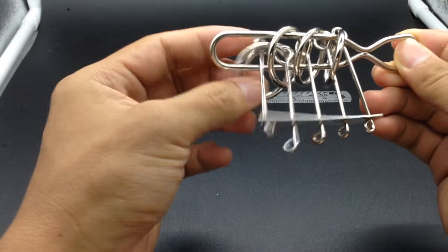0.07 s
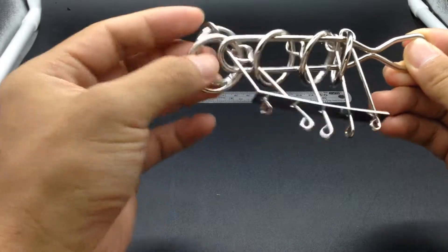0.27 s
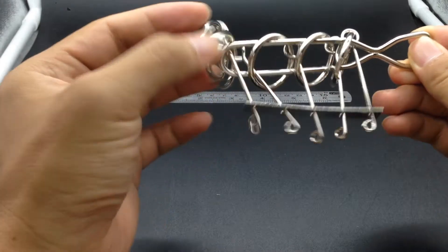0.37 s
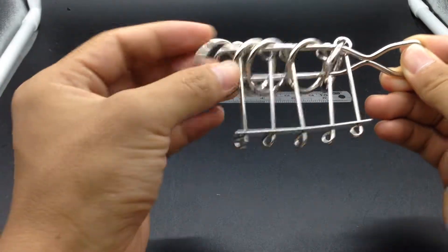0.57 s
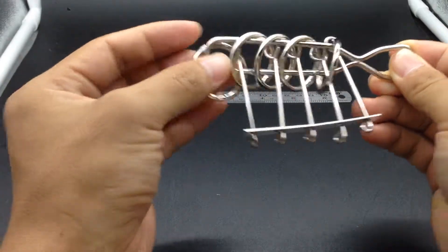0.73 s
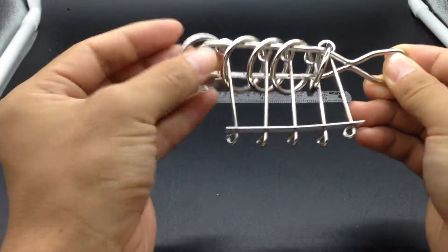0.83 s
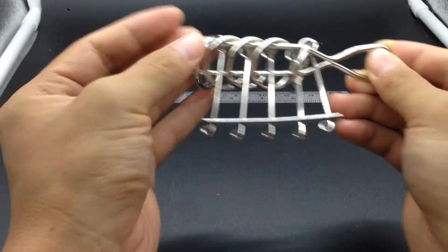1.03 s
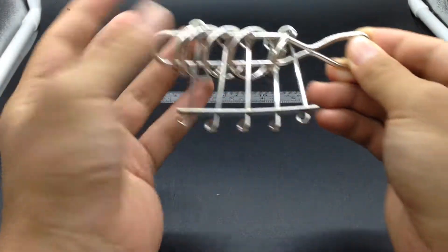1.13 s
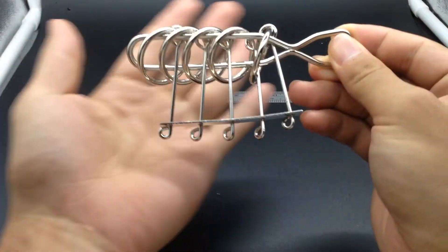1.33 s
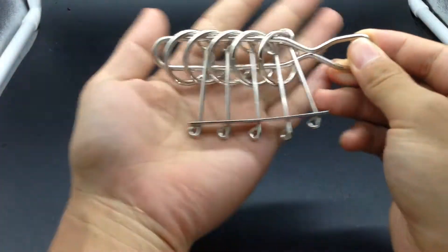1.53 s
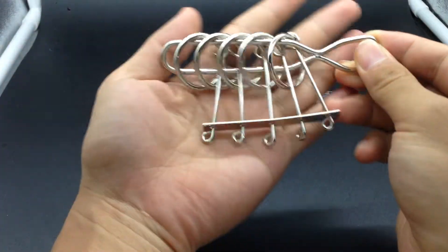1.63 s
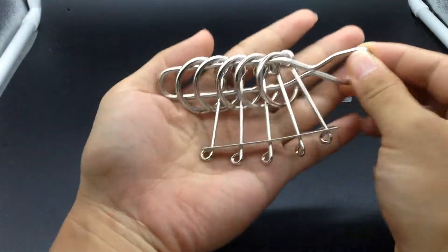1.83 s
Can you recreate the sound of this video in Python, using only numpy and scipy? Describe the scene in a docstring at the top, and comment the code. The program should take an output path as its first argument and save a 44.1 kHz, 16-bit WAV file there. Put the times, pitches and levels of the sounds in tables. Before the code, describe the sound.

Thin steel rings and rods clash and chatter brightly as hands shake a wire puzzle

```python
"""Steel rings and rods of a wire puzzle, worked by hands close to a microphone, clash, chatter and ring briefly.
Each clash is a train of impulses exciting decaying modes, with a metallic hiss; some modes sing out alone.
Loose wires rattle as dense random ticks; the base bar, the frame and the hands give short, duller knocks.
Filtered noise forms the quiet room's hiss, a low rumble and the swish of a hand.
Two hum tones beat against each other beside a faint steady whine."""
import sys
import numpy as np
from scipy import signal
from scipy.fft import rfft, irfft, next_fast_len
from scipy.io import wavfile
from scipy.ndimage import uniform_filter1d, map_coordinates

SR = 44100
rng = np.random.default_rng(int(sys.argv[2]) if len(sys.argv) > 2 else 0)


def to_wav(s):
    """Save 16-bit WAV."""
    ch = np.atleast_2d(s).T  # columns
    pcm = np.round(np.clip(ch, -1, 1) * 32767)  # PCM
    wavfile.write(sys.argv[1], SR, pcm.astype(np.int16))


def ratio(d):
    """dB to gain"""
    e = np.asarray(d, float) / 20
    return 10 ** e


N = 83790

# spectrum of the room hiss: (frequency [Hz], relative density [dB])
ROOM_SPECTRUM = [(20, -25.5), (70, 2.5), (130, -6.5), (400, -9), (700, -14.5), (1080, -16.5), (2000, -20),
                 (3000, -23.5), (8000, -26), (15600, -29.5)]
# course of the low rumble: (time [s], level [dB])
RUMBLE_LEVEL = [(0, -62), (.15, -61), (.6, -62), (1.2, -64.5), (1.4, -72), (1.7, -63), (1.9, -66.5)]
# spectrum of the low rumble: (frequency [Hz], relative density [dB])
RUMBLE_SPECTRUM = [(40, -29), (70, -5), (130, -3), (195, 3.5), (260, -7), (370, -3.5), (600, -18),
                   (1000, -52)]
# course of the hum, 3 dB above the peak of its lower tone: (time [s], level [dB])
HUM_LEVEL = [(0, -57), (.3, -55.5), (.55, -58.5), (.75, -55.5), (1.24, -54), (1.32, -70), (1.75, -60),
             (1.9, -63)]
# modes of the wire: name = frequency [Hz]
WIRE_MODES = dict(a=3750, b=5100, c=5720, d=6915, e=7510, f=7940, g=8645, h=8740, i=9312, j=10100, k=11003, l=12155, m=12470, n=12830, o=13150, p=13489, q=13565, r=13900, s=14150, t=14466)
# balance of the clash hiss and of the wire's modes: (frequency [Hz], relative level [dB])
CLASH_SPECTRUM = [(1500, -32.5), (2420, -16), (2670, -25.5), (3160, -18.5), (4530, -13.5), (8480, -3.5),
                  (11500, -5), (13000, -2), (15600, -8)]
# how much the loose wires shake: (time [s], level [dB])
SHAKE_LEVEL = [(0, -75), (.22, -61.5), (.3, -54), (.6, -55.5), (.82, -61), (1.12, -67.5), (1.22, -87),
               (1.53, -78), (1.6, -54), (1.78, -64), (1.9, -72)]
# clashes of rings on rods, 16 dB above the held envelope:
# (time [s], level [dB], chatter [s], nominal 60 dB decay [s])
CLASHES = [(0.0064, -39, 0.0085, 0.025), (0.0238, -41.5, 0.0091, 0.095), (0.1053, -37.5, 0.0065, 0.035),
           (0.126, -38, 0.0093, 0.057), (0.177, -38, 0.0075, 0.08), (0.191, -45.5, 0.0092, 0.23),
           (0.2434, -28.5, 0.0056, 0.11), (0.2765, -35, 0.012, 0.24), (0.2987, -26, 0.017, 0.11),
           (0.3242, -28.5, 0.0058, 0.11), (0.3663, -32.5, 0.0083, 0.078), (0.3983, -32, 0.01, 0.08),
           (0.4368, -34, 0.012, 0.12), (0.4698, -32, 0.011, 0.16), (0.4832, -28, 0.019, 0.19),
           (0.509, -27, 0.0086, 0.14), (0.5455, -29.5, 0.024, 0.11), (0.622, -37, 0.013, 0.11),
           (0.6359, -30.5, 0.011, 0.079), (0.6599, -35.5, 0.0079, 0.073), (0.6857, -27.5, 0.007, 0.14),
           (0.7158, -26.5, 0.006, 0.17), (0.753, -29.5, 0.013, 0.1), (0.7854, -29, 0.0099, 0.1),
           (0.8006, -27, 0.015, 0.054), (0.851, -36, 0.004, 0.03), (0.8721, -37.5, 0.0063, 0.027),
           (0.93, -39.5, 0.012, 0.086), (0.9528, -33.5, 0.004, 0.06), (0.9647, -33, 0.0046, 0.12),
           (1.0764, -36.5, 0.0055, 0.05), (1.1407, -30.5, 0.013, 0.053), (1.1725, -24.5, 0.011, 0.082),
           (1.4148, -41.5, 0.0068, 0.042), (1.5385, -39, 0.0085, 0.1), (1.5499, -32.5, 0.01, 0.08),
           (1.5579, -26, 0.0095, 0.11), (1.6244, -40, 0.0064, 0.051), (1.6434, -31.5, 0.006, 0.046),
           (1.6792, -33.5, 0.008, 0.15), (1.7221, -28.5, 0.01, 0.059), (1.745, -37.5, 0.009, 0.05),
           (1.8171, -33, 0.0029, 0.08)]
# single modes that sing out: (time [s], mean rms level while held [dB], hold [s], 60 dB decay [s], mode name)
SINGING_MODES = [(.007, -51, 0.0018, 0.027, "c"), (.253, -48, 0.013, .07, "q"),
                 (.302, -46, .005, 0.052, "e"), (0.314, -41, 0.02, .1, "r"),
                 (.308, -49.5, 0.018, 0.069, "g"), (.31, -52.5, 0.038, 0.11, "i"),
                 (.455, -50, 0.02, 0.092, "q"), (.475, -43, .01, .1, "r"), (0.4844, -30, 0.019, 0.093, "p"),
                 (.485, -43, 0.029, 0.14, "i"), (.5, -43, 0.011, 0.04, "f"),
                 (0.531, -50, 0.014, 0.033, "d"), (.545, -55, 0.018, 0.042, "c"),
                 (0.662, -54, .015, 0.1, "i"), (0.686, -38, 0.0041, 0.029, "n"),
                 (.7175, -45, 0.01, 0.06, "q"), (.756, -50, 0.0091, 0.048, "f"),
                 (.687, -39.5, 0.0055, .03, "l"), (.722, -52, 0.011, .05, "i"),
                 (.757, -50, .01, 0.026, "d"), (.761, -52, 0.0032, 0.023, "b"),
                 (0.933, -58, 0.018, .05, "f"), (1.172, -32.5, 0.0025, 0.017, "o"),
                 (1.175, -42, 0.0039, 0.038, "g"), (1.542, -60, 0.017, 0.054, "g"),
                 (1.558, -35.5, 0.0051, 0.03, "g"), (1.572, -49.5, 0.016, 0.045, "h"),
                 (1.558, -54, 0.0062, 0.039, "a"), (1.56, -50.5, 0.0057, 0.023, "b"),
                 (1.791, -63, 0.0065, 0.082, "f"), (1.817, -49, 0.0022, 0.032, "i")]
# low bump through the hands: (time [s], peak level [dB])
HAND_BUMPS = [(.105, -52)]
# knocks on the base bar: (time [s], peak level [dB])
BAR_KNOCKS = [(0.2424, -55), (0.3002, -48), (0.3676, -53.5), (0.4369, -52), (0.6868, -49), (0.7158, -54),
              (0.7524, -49.5), (0.7848, -53), (0.85, -52.5), (1.1762, -65)]
# modes of the base bar: (frequency [Hz], mean relative level [dB])
BASE_BAR_MODES = [(2080, -10), (2420, -3)]
# soft taps on the frame: (time [s], peak level [dB], centre [Hz])
FRAME_TAPS = [(1.2302, -49, 1820), (1.4065, -41, 3300), (1.8164, -41, 4870)]
# modes of the tapped frame: (frequency [Hz])
FRAME_HZ = [1680, 2220, 3010, 3880, 4250, 5300, 5650, 6200]
# spectrum of the hand's swish: (frequency [Hz], relative density [dB])
SWISH_SPECTRUM = [(200, -21), (480, -2), (3000, -27)]


def unit(x):
    """Normalisation: the root mean square becomes 1."""
    return x / np.sqrt(np.mean(x ** 2) + 1e-20)


def curve(rows):
    """Level course: decibels vary linearly between (s, dB) rows; returns the gain per sample."""
    s, db = np.transpose(rows)
    return ratio(np.interp(np.arange(N) / SR, s, db))


def coloured(x, points):
    """Linear filtering: the spectrum of x is weighted by (Hz, dB) points on a log-frequency axis."""
    m = next_fast_len(len(x) + 2048)
    f, db = np.transpose(points)
    log_hz = np.log(np.fft.rfftfreq(m, 1 / SR) + 1)
    gain = ratio(np.interp(log_hz, np.log(f), db))
    return irfft(rfft(x, m) * gain, m)[:len(x)]


def patchy(x, depth_db):
    """Random modulation: smoothed noise varies the gain over time and frequency."""
    z = signal.stft(x, nperseg=2048)[2]
    field = uniform_filter1d(rng.standard_normal(z.shape), size=4, axis=0)
    field = uniform_filter1d(field, size=3, axis=1)
    return unit(signal.istft(z * ratio(depth_db * unit(field)), nperseg=2048)[1][:N])


def hold_decay(t, held, t60, attack):
    """Driven, then free vibration: a quick rise, a hold and an exponential decay."""
    return (1 - np.exp(-t / attack)) * ratio(-60 * np.maximum(t - held, 0) / t60)


def add(out, s, x):
    """Superposition: x is summed into out from s seconds on."""
    part = out[max(round(s * SR), 0):][:len(x)]
    part += x[:len(part)]


def room_hiss():
    """Stationary noise: a fixed spectrum colours white noise."""
    return ratio(-60.5) * unit(coloured(rng.standard_normal(N), ROOM_SPECTRUM))


def rumble():
    """Non-stationary noise: low-frequency noise wanders in spectrum and level."""
    noise = coloured(rng.standard_normal(N), RUMBLE_SPECTRUM)
    return curve(RUMBLE_LEVEL) * patchy(noise, depth_db=3.5)


def hum():
    """Beating: two close tones reinforce and cancel at their difference frequency."""
    lower_hz, beat_hz, beat_peak_s = 87.9, 12.09, 0.74
    t = np.arange(N) / SR - beat_peak_s
    lower = np.cos(2 * np.pi * lower_hz * t)
    upper = ratio(-0.5) * np.cos(2 * np.pi * (lower_hz + beat_hz) * t)
    return ratio(-3.0) * curve(HUM_LEVEL) * (lower + upper)


def whine():
    """Simple harmonic oscillation: one faint tone of constant amplitude."""
    t = np.arange(N) / SR - 0.74
    return ratio(-77) * np.cos(2 * np.pi * 883 * t)


def wire_ring(t, t60, count):
    """Modal superposition: a blow excites the named modes and a dense crowd of chance ones, at new levels."""
    draw = np.clip(rng.standard_normal((len(WIRE_MODES) + count, 2, 1)), -2, 1.5)
    hz = np.r_[list(WIRE_MODES.values()), rng.uniform(1900, 15400, count)][:, None]
    f, db = np.transpose(CLASH_SPECTRUM)
    level = np.interp(np.log(hz), np.log(f), db) + 2 * draw[:, 0]
    mode_t60 = t60 * np.exp(0.25 * draw[:, 1])
    tones = np.sin(2 * np.pi * (hz * t + rng.random(hz.shape)))
    modes = ratio(level - 60 * t / mode_t60) * tones
    return modes.sum(0) * (1 - np.exp(-t / 0.00009))


def rattle():
    """Random impulse excitation: tiny ticks between loose wires ring them, following the shake."""
    ticks_per_s, tick_t60_s, strength_range_db = 400, 0.036, 1.5 * 4.9
    t, out = np.arange(SR // 16) / SR, 0
    for part in range(6):  # six different rings share the ticks
        draw = rng.random((2, N))
        ticks = (draw[0] < ticks_per_s / 6 / SR) * ratio(strength_range_db * draw[1])
        ring = unit(wire_ring(t, tick_t60_s, count=40))
        out = out + signal.fftconvolve(ticks, ring)[:N]
    return unit(out) * curve(SHAKE_LEVEL)


def clashes():
    """Repeated impact: each clash is a run of bounces that ring the wire, over a metallic hiss."""
    bounces_per_s, first_blow, hiss_db = 500, 7, 0.5  # blow as linear strength, hiss relative to the ring
    out, t = np.zeros(N), np.arange(SR // 6) / SR
    for s, db, held, t60 in CLASHES:
        draw = rng.random((2, len(t)))
        struck = (draw[0] < bounces_per_s / SR) & (t < held)
        bounces = struck * (0.28 + 2 * draw[1] ** 2) + first_blow * (t == 0)
        ring = signal.fftconvolve(bounces, wire_ring(t, t60, count=70))[:len(t)]
        shape = hold_decay(t, held, t60, attack=0.00038)
        hiss = unit(coloured(rng.standard_normal(len(t)), CLASH_SPECTRUM)) * shape
        ring = ring * np.linalg.norm(shape) / np.linalg.norm(ring)  # energy of the envelope
        add(out, s, ratio(db - 16.0) * (ring + ratio(hiss_db) * hiss))
    return out


def singing():
    """Sustained resonance: chatter keeps one mode of a free ring going, unsteady in level and phase."""
    out, t = np.zeros(N), np.arange(SR // 4) / SR
    for s, db, held, t60, mode in SINGING_MODES:
        # two smooth random courses, 250 points per second
        rows = np.repeat([[0], [1]], len(t), 1)
        level_waver, phase_waver = map_coordinates(rng.standard_normal((2, 80)), [rows, [t * 250] * 2])
        tone = np.sin(2 * np.pi * WIRE_MODES[mode] * t + 0.55 * phase_waver)
        level = np.sqrt(2) * ratio(db + 1.8 * level_waver)
        add(out, s, level * tone * hold_decay(t, held, t60, attack=0.001))
    return out


def knocks(events, modes, t60, held):
    """Forced resonance: a sharp contact and a short noise puff excite a few modes."""
    out, t = np.zeros(N), np.arange(SR // 8) / SR
    for s, db in events:
        puff = rng.standard_normal(len(t)) * hold_decay(t, held, 0.021, attack=0.0002)
        puff[0] = np.linalg.norm(puff)  # the first contact is one clean blow
        ring = 0
        for hz, mode_db in modes:
            level = ratio(mode_db + rng.normal(0, 1.8) - 60 * t / t60)
            ring = ring + level * np.sin(2 * np.pi * hz * t)
        ring = signal.fftconvolve(puff, ring)[:len(t)]
        add(out, s, ratio(db) * ring / np.abs(ring).max())
    return out


def hand_bumps():
    """Single-mode response: a bump through the hands excites one low resonance."""
    return knocks(HAND_BUMPS, [(322, 0)], t60=0.14, held=0.0186)


def bar_knocks():
    """Two-mode response: blows on the base bar excite a close pair of resonances."""
    return knocks(BAR_KNOCKS, BASE_BAR_MODES, t60=0.034, held=0.0027)


def taps():
    """Selective excitation: each soft tap on the frame favours the modes near its centre frequency."""
    out = np.zeros(N)
    for s, db, centre_hz in FRAME_TAPS:
        # 9 dB loss an octave away from the centre
        modes = [(hz, -9 * np.log2(hz / centre_hz) ** 2) for hz in FRAME_HZ]
        out += knocks([(s, db)], modes, t60=0.018, held=0.0071)
    return out


def swish():
    """Modulated noise: the open hand sweeping past gives a soft gust under a Gaussian envelope."""
    peak_s, width_s = 1.35, 0.07
    envelope = np.exp(-((np.arange(N) / SR - peak_s) / width_s) ** 2)
    return ratio(-65) * envelope * unit(coloured(rng.standard_normal(N), SWISH_SPECTRUM))


def scene():
    """Superposition: all sources sum linearly in one channel."""
    room = room_hiss() + rumble() + hum() + whine()
    wires = rattle() + clashes() + singing()
    dull_blows = hand_bumps() + bar_knocks() + taps()
    return (room + wires + dull_blows + swish())[None]


def roll_off(x):
    """The treble ends steeply here."""
    return signal.sosfilt(signal.butter(12, 15700, fs=SR, output="sos"), x)


def record(dry):
    """Band limitation: a zero-phase low-pass at 15.2 kHz removes the highest treble."""
    low_pass = signal.butter(N=12, Wn=15200, fs=SR, output="sos")
    mix = signal.sosfiltfilt(low_pass, dry)
    return roll_off(mix)


dry = scene()
out = record(dry)
to_wav(out)
```